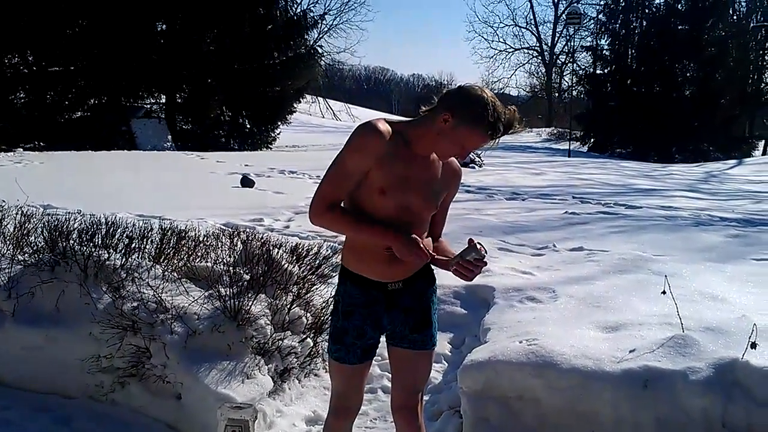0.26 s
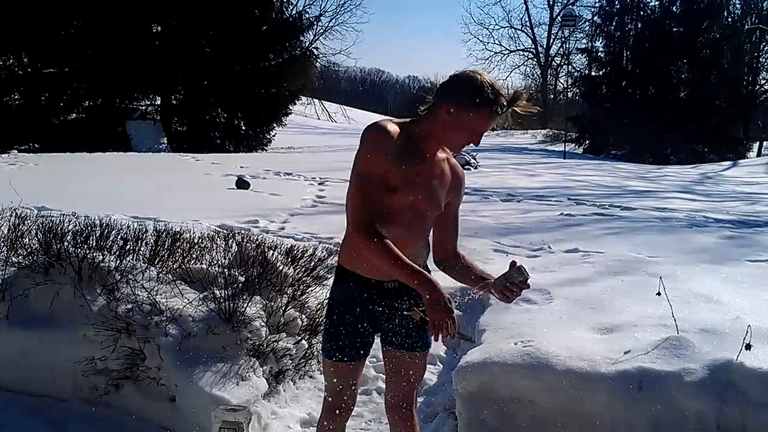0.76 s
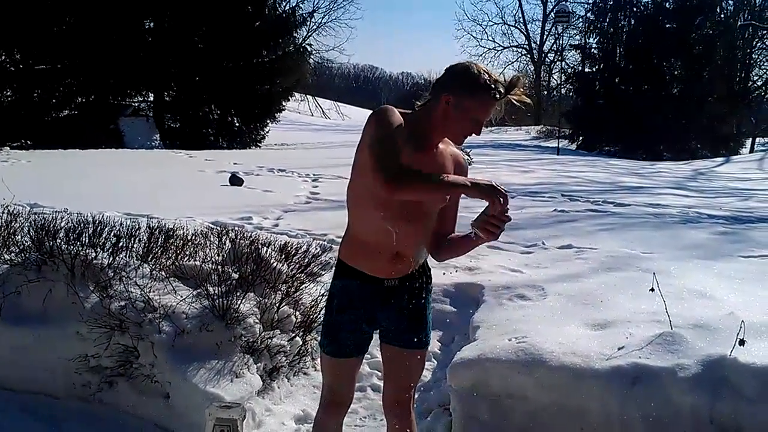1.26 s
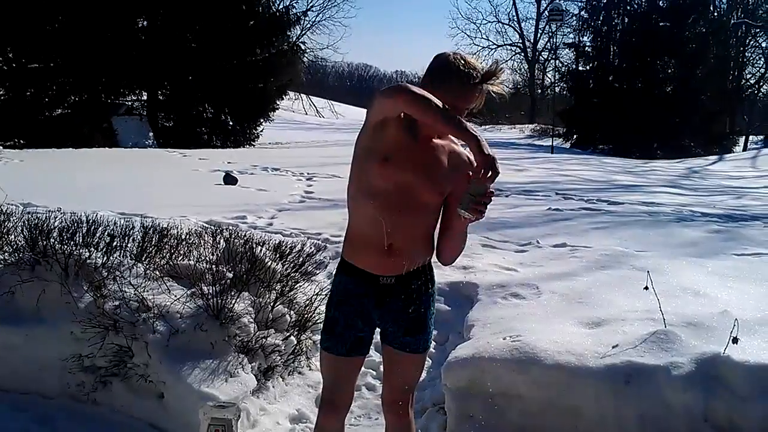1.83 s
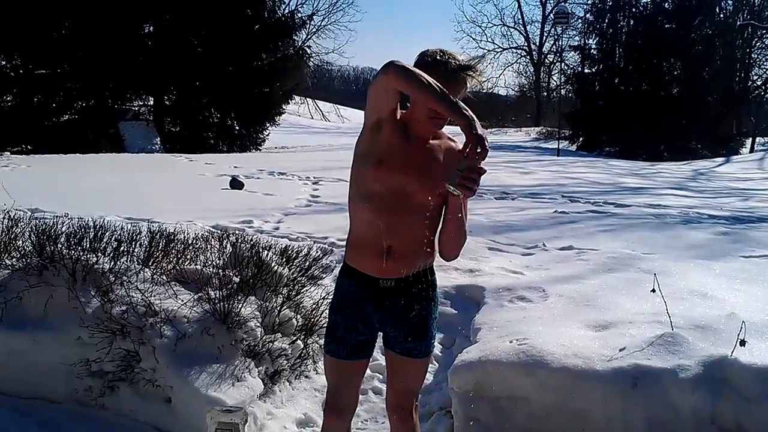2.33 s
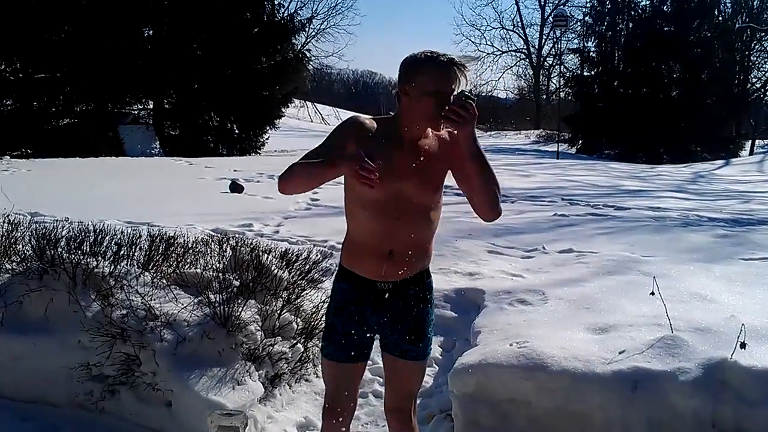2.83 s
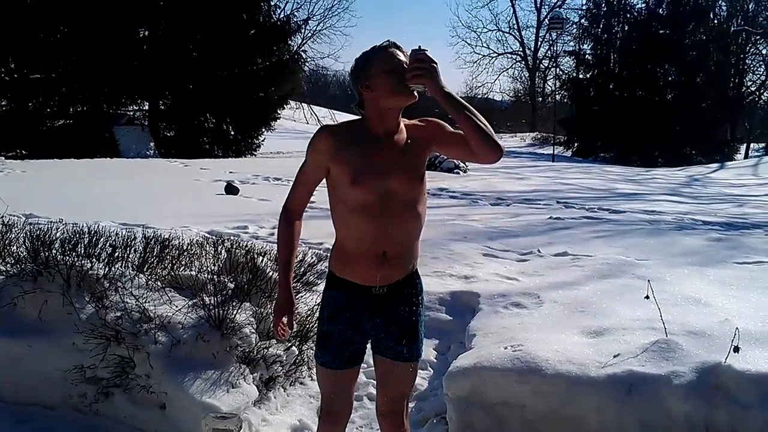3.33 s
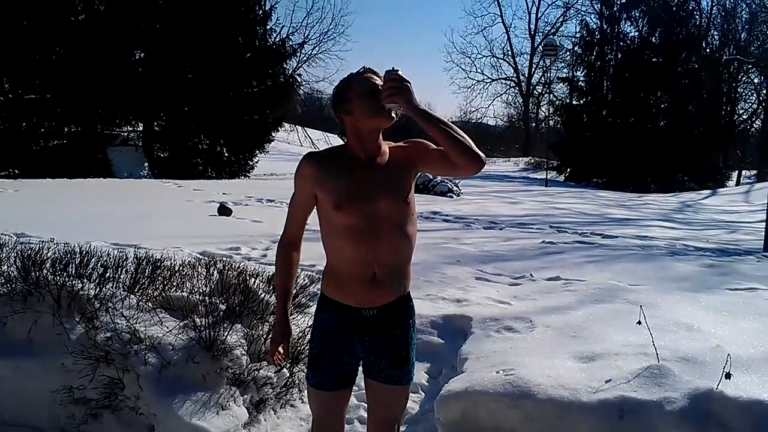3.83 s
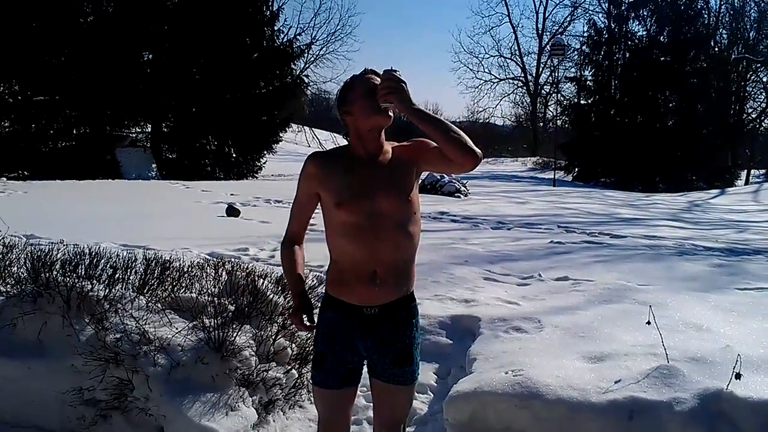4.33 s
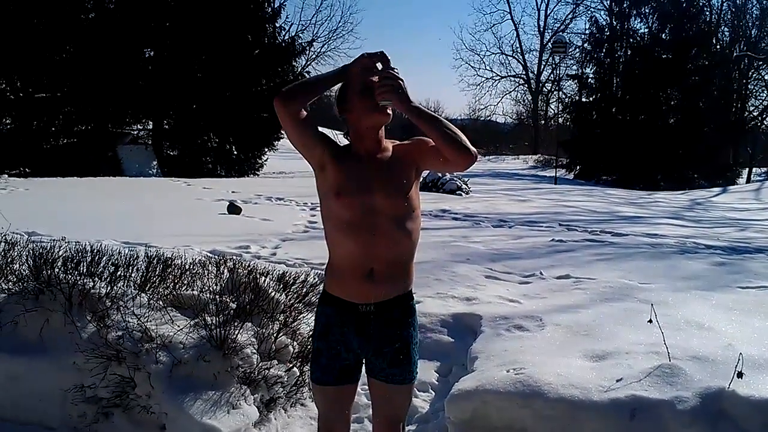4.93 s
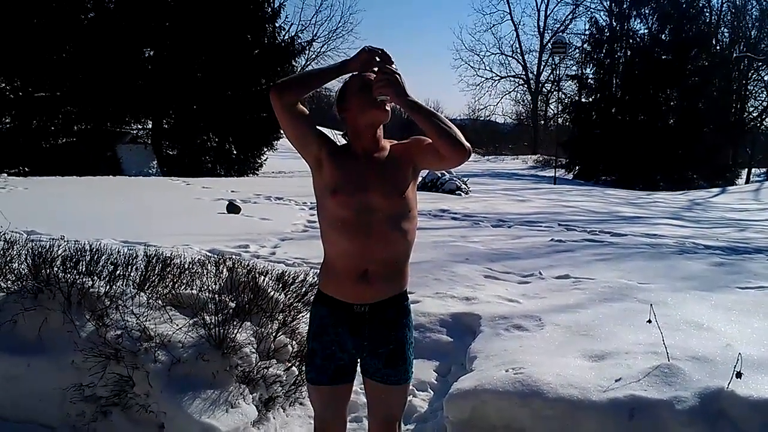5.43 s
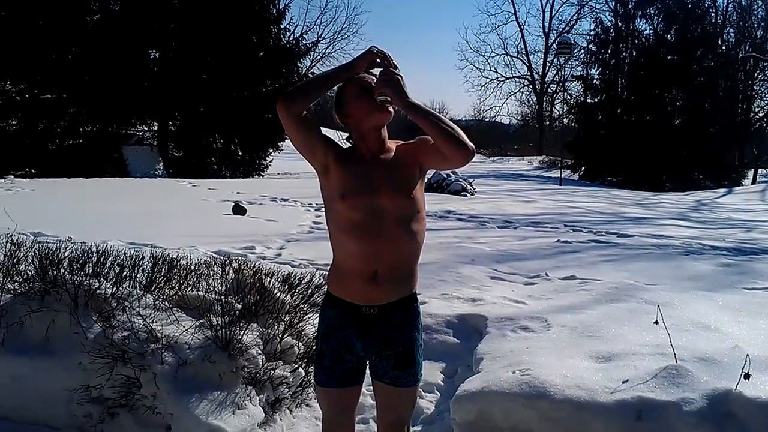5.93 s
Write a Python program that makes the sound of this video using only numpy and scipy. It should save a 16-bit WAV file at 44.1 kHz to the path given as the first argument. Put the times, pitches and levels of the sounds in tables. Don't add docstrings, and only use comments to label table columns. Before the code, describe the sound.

A drink can is pierced with a brief gas spray, then its lid cracks open loudly, amid water dripping on sheet metal and wind.

```python
import sys
import numpy as np
from scipy import signal
from scipy.fft import rfft, irfft, next_fast_len
from scipy.io import wavfile
from scipy.ndimage import uniform_filter1d

SR = 44100
rng = np.random.default_rng(int(sys.argv[2]) if len(sys.argv) > 2 else 0)


def undo_db(level):
    steps = np.asarray(level, float) / 20
    return 10 ** steps


def store_pcm(level_fs):
    pcm = np.round(np.clip(level_fs, -1, 1) * 32767).astype(np.int16)
    wavfile.write(sys.argv[1], SR, np.atleast_2d(pcm).T)


N = 272097
TIME = np.arange(N) / SR
SIZE = 2 * next_fast_len((N + SR) // 2)
HZ = np.maximum(np.arange(SIZE // 2 + 1) * SR / SIZE, 1)
SUDDEN_S = 5e-5


# time in seconds, level in dB.
SNAP_LEVEL = [
    (2.3843, -96),
    (2.3852, -8),
    (2.388, -4.5),
    (2.395, -7),
    (2.41, -14.5),
    (2.425, -24),
    (2.44, -52),
    (2.47, -88),
]
# frequency in Hz, level in dB per Hz.
SNAP_COLOUR = [(60, -48.5), (150, -22), (560, -21), (720, -12.5), (1000, -12), (1400, -12), (2100, -5),
               (2700, -10), (3900, -3), (4700, -10), (6800, -14), (8700, -12), (16000, -31.5)]
# frequency in Hz, width in Hz, level in dB.
CAN_MODES = [(2076, 60, 2.5), (2694, 44, 4), (3210, 74, -1), (3600, 60, -11.5), (3844, 46, 7.5),
             (4320, 26, -7), (4550, 11, -16), (4700, 44, -25.5), (5870, 45, -23), (6300, 91, -30),
             (8320, 31, -16.5), (8400, 43, -22.5)]


def snap():
    body = colour(SNAP_COLOUR) + modes(CAN_MODES) * undo_db(-6.5)
    crackle = grains(15000, spread_db=-1.0)
    return through(level(SNAP_LEVEL) * undo_db(2.0 * drift(147.2)) * crackle, body)


# start in
# seconds, peak in dB, level of the edge above 7 kHz in dB, main ring in Hz, time for the rattle to fall 60 dB
# in seconds.
CLICKS = [(0.384, -37, -55, 2050, .03), (0.432, -23, -37, 5170, 0.089), (1.1276, -30, -51, 4800, 0.04),
          (1.4184, -29, -60, 3150, 0.11), (1.166, -24.5, -31.5, 4840, 0.13),
          (1.176, -21.5, -36.5, 3490, 0.055), (2.1012, -29, -72, 1770, 0.02), (2.1387, -23, -33, 2140, 0.1),
          (2.3164, -32, -51, 2470, 0.049), (2.348, -20, -30, 4400, 0.07), (2.356, -27, -50, 5600, .2),
          (2.496, -17, -50.5, 2180, 0.05), (2.5678, -18, -38, 6200, 0.025), (2.58, -32, -60, 5000, .02),
          (.231, -27, -48, 3300, .04), (3.29, -30, -70, 3300, .1), (5.8235, -36, -66, 3500, .05),
          (6.0205, -38, -66, 3600, .05), (1.0015, -42, -50, 6000, .02), (.9545, -44, -50, 6000, .02),
          (2.0705, -37, -60, 4500, .02), (2.0605, -46, -64, 6000, .015), (5.2225, -34, -52, 3880, .04),
          (2.819, -38, -50, 4800, 0.02), (3.0846, -33, -52, 4600, 0.03), (1.493, -36, -58, 3300, .06),
          (1.644, -38, -56, 5000, .03), (1.861, -40, -58, 3400, .04), (3.2933, -27, -84, 2012, 0.26),
          (3.451, -26, -51, 2290, 0.11), (5.228, -28, -52, 3220, 0.13), (.8993, -23, -55, 4200, .08),
          (0.904, -30, -48, 4500, 0.22), (.926, -36, -49, 4400, .04), (5.49, -17, -32, 3190, 0.05),
          (5.498, -21, -48.5, 3000, 0.07)]


def clicks():
    rattle = bursts((s, db - 16.0, 0.001, t60) for s, db, edge_db, hz, t60 in CLICKS)
    edge = bursts((s, edge_db - 3.5, 0.00037, .5 * t60) for s, db, edge_db, hz, t60 in CLICKS)
    rings = swells((s, db - 14.5, hz, SUDDEN_S, t60) for s, db, edge_db, hz, t60 in CLICKS)
    wall = colour([(700, -19.5), (1800, 0), (4500, -5.0), (6500, -14.5), (8000, -35.0), (16000, -102)])
    wall = wall * (1 + modes(CAN_MODES) * undo_db(-5.0))
    bright = colour([(3000, -25.0), (6500, 1.0), (9500, -6.5), (16000, -20.5)])
    noise = grains(10000, spread_db=3.0)
    return through(rattle * noise, wall) + through(edge * noise, bright) + rings


# peak time in seconds, level in dB, pitch in Hz, rise in seconds, time to fall 60 dB in seconds.
FLARES = [(.4105, -34.5, 4350, .003, .04), (.416, -37, 3900, .002, .03), (.424, -31, 3270, 0.0039, .04),
          (.433, -36, 5840, 0.0011, .02), (.434, -38, 1750, 0.0033, .06), (.906, -35, 5280, 0.0025, 0.03),
          (.93, -40, 1610, 0.0051, .05), (2.145, -36.5, 3900, 0.0028, 0.035),
          (2.156, -43, 3900, 0.0027, .05), (2.109, -49, 3600, 0.0038, 0.037), (5.83, -48, 2590, .003, .06),
          (5.83, -49, 3500, .003, .06), (1.1765, -30, 4700, 0.0009, .025), (1.1765, -35, 2400, .001, .025),
          (2.3865, -18, 4650, 0.0013, .03), (2.3885, -10.5, 2150, 0.0026, .05),
          (2.393, -9, 3870, 0.0042, 0.031), (2.3965, -8, 4020, .003, .045), (2.405, -15, 3950, .002, .03),
          (2.4005, -14, 4280, .003, .04), (2.4015, -18, 3200, .002, .025), (2.412, -22, 4350, .003, .05),
          (2.47, -38, 4550, .006, .06), (2.455, -40, 3400, .004, .06), (2.975, -42, 4500, .002, .025),
          (2.84, -46, 3150, .005, .04), (3.14, -44, 3750, .005, .05), (2.984, -40, 2100, .002, .03),
          (2.4985, -28, 2180, .002, .06), (3.297, -30.5, 2022, 0.0019, 0.047),
          (.262, -39, 2210, .01, 0.099), (2.414, -17, 3900, .003, 0.054), (2.417, -23.5, 1820, .003, 0.037),
          (2.4255, -25, 3160, .003, .025), (2.431, -29.5, 2250, .002, .03), (2.433, -39, 3350, .002, .03),
          (2.498, -27.5, 3410, .001, 0.044), (2.504, -40, 3830, .002, .04),
          (2.578, -30, 3050, 0.00083, 0.027), (5.493, -32, 2780, 0.0022, 0.057),
          (5.498, -32.5, 3330, 0.0018, .05)]
# start in seconds, level in dB, hold in seconds, time to fall 60 dB in seconds.
SCRAPE = (2.446, -35, 0.036, .05)
# frequency in Hz, level in dB per Hz.
SCRAPE_COLOUR = [(2000, -25), (2900, -8), (3500, -1), (4000, -6), (4600, -1.5), (5200, -12), (6500, -25),
                 (16000, -60)]


def flares():
    scrape = through(bursts([SCRAPE]) * grains(6000, spread_db=-0.5), colour(SCRAPE_COLOUR))
    return swells(FLARES) * undo_db(2.4 * drift(250)) + scrape


# peak time in seconds, level in dB, pitch in Hz, rise in seconds, time to fall 60 dB in seconds.
GLUGS = [(.438, -35.5, 948, 0.0021, 0.098), (1.177, -22.5, 870, 0.0015, 0.014),
         (2.39, -2, 724, 0.0024, 0.045), (2.402, -17, 845, 0.0086, 0.043),
         (2.424, -28.5, 606, 0.0058, 0.043), (2.502, -28.5, 790, 0.0042, 0.066),
         (2.577, -14.5, 790, 0.0046, 0.045), (2.57, -23.5, 870, 0.007, 0.034), (2.584, -28, 880, .003, .06),
         (5.775, -47, 700, .006, .05), (5.2, -45, 800, 0.0036, .05), (5.18, -46.5, 520, 0.0075, .08),
         (2.984, -36, 980, 0.002, 0.02), (2.975, -40, 900, .002, .025), (3.04, -44, 900, .003, .03),
         (3.052, -43, 1000, .003, .04), (3.6, -40, 670, .003, 0.025)]


def glugs():
    return swells(GLUGS) * undo_db(2.5 * drift(70))


# start in seconds, rise in seconds, level in dB, sag in dB per second, stop in seconds.
JETS = [
    (.381, .003, -53.5, 1.5, 0.45),
    (0.397, 0.01, -36.5, 69, 0.65),
    (2.344, 0.006, -46, 28.5, 2.38),
    (2.425, 0.013, -39, 50, 2.485),
]


def jets(rows):
    out = np.zeros(N)
    for s, rise, db, sag, stop in rows:
        opening = np.clip((TIME - s) / rise, 0, 1) ** 2
        sagged_db = sag * np.clip(TIME - s - rise, 0, stop - s)
        shut_db = 360 * np.clip(TIME - stop, 0, 1)
        out += opening * undo_db(db - sagged_db - shut_db)
    return out


# peak time in seconds, level in dB, rise in seconds, time to fall 60 dB in seconds.
STIRS = [
    (.3, -69, 3.6, 14.6),
    (1.08, -56, 0.084, 0.97),
    (2.2, -71.5, 0.6, 1.6),
    (2.87, -69, 0.39, 1.2),
    (3.1, -69, 0.3, 28),
    (3.6, -70, .06, 1.0),
    (5.65, -76, 0.06, 2.6),
    (5.37, -76, .05, .6),
]


def froth():
    out = np.zeros(N)
    for s, db, rise, t60 in STIRS:
        swell = np.exp(-(np.minimum(TIME - s, 0) / rise) ** 2)
        out += swell * undo_db(db - 60 * np.maximum(TIME - s, 0) / t60)
    return out


# start in seconds, peak in dB.
BUBBLE_POPS = [(0.235, -45), (0.52, -25), (.628, -32), (0.9046, -52), (1.0658, -38), (1.4555, -42.5),
               (1.493, -44), (1.54, -37.5), (1.5577, -38), (1.596, -48), (1.644, -40), (1.9848, -34),
               (2.7195, -41), (2.8898, -34), (2.934, -39), (2.9807, -35), (3, -36), (3.0364, -39),
               (3.24, -51), (3.365, -46), (3.494, -48), (3.404, -37), (3.5454, -36), (3.6513, -43),
               (3.6877, -34), (3.9935, -39), (4.6635, -47.5), (5.3553, -44), (5.928, -44)]
# frequency in Hz, level in dB per Hz.
JET_COLOUR = [(500, -24.5), (1000, -6), (2500, -8.5), (4200, -3.5), (6900, -7), (9700, -8.5),
              (13000, -14.5), (16000, -15.5)]
# frequency in Hz, level in dB per Hz.
FIZZ_COLOUR = [(800, -17), (2000, -38.5), (4200, 2), (6900, -5.5), (9700, -6.5), (13000, -15.5),
               (16000, -13.5)]


def spray():
    gas = rng.standard_normal(N) + 0.6 * grains(1500, spread_db=2.5)
    gas = undo_db(1.6 * drift(60)) * gas
    slit = signal.butter(2, [7000, 12500], "band", fs=SR, output="sos")
    jet = jets(JETS[:-1]) * gas + signal.sosfilt(slit, jets(JETS[-1:]) * gas)
    bubbling = rng.standard_normal(N) + 0.28 * grains(710, spread_db=3.5)
    fizz = froth() * undo_db(3.0 + 2.2 * drift(25) + 2.0 * drift(9.1)) * bubbling
    pops = bursts((s, db - 7.5, 0, 0.0095) for s, db in BUBBLE_POPS) * rng.standard_normal(N)
    pitches = rng.uniform(4800, 11200, len(BUBBLE_POPS))
    rings = swells((s, db - 8.0, hz, SUDDEN_S, 0.0081) for (s, db), hz in zip(BUBBLE_POPS, pitches))
    return through(jet, colour(JET_COLOUR)) + through(fizz + pops, colour(FIZZ_COLOUR)) + rings


# frequency in Hz, width in Hz, level in dB.
SHEET_MODES = [(1262, 24, 1), (1360, 23, 0), (1476, 8.4, 4), (1530, 7, -4), (1551, 8.8, 3.5),
               (1593, 17, -3), (1644, 29.6, 4.5), (1820, 9.6, -9), (2180, 13.7, 3.5), (2290, 33, 0.5),
               (2513, 54, -1), (2960, 30, 2), (3150, 4.4, 0.5), (3130, 13, 3), (3550, 11, -1),
               (4020, 13, -2)]
# frequency in Hz, level in dB per Hz.
SHEET_CROWD = [(1000, -47), (1190, -16), (1260, 1), (1700, -6), (2600, -7), (2750, -13), (3200, 5),
               (4000, 3), (4600, -2), (6400, -6), (7000, -20.5), (12000, -27)]
# start in seconds, peak in dB, then upper modes
# and long ring in dB beside the peak.
DROP_ROWS = [(.001, -36, -12, -7), (.0473, -31.5, -14, -15), (.2319, -27.5, -10.5, -5.5),
             (.3825, -39.5, -11, -12), (.7312, -42, -16, -24), (.8999, -30.5, -3, -14.5),
             (1.0425, -39, -30, -5), (1.3853, -35, -7.5, -11.5), (1.6352, -43, -5, -23),
             (2.1444, -34.5, -0.5, -7), (2.3296, -32.5, -10, -20), (2.4444, -31.5, -6, -7),
             (2.5681, -31, -12, -28), (2.6494, -32.5, -21, -10), (2.7194, -38, -13, -19),
             (2.834, -44, -12, -20), (2.974, -41, -7.5, -30), (3.1394, -36, -9.5, -2.5),
             (3.2585, -43, -21, -10), (3.4032, -36, -1, -12), (3.4735, -34, -11, -5),
             (3.5384, -36, 0.5, -9), (3.7214, -37.5, -9.5, -8), (3.9883, -34.5, -16.5, -25.5),
             (4.2552, -33.5, -12, -28), (4.3974, -31.5, -11.5, -23), (5.1123, -41, -17, -12.5),
             (5.221, -36, -1.5, -15), (5.3, -49, -15, 0), (5.5713, -44, -8, -14),
             (5.5288, -31.5, -9, -13.5), (5.6092, -38.5, -3.5, -4)]
# start in seconds, peak in dB.
MORE_DROPS = [(0.15, -46), (1.125, -44.5), (1.2091, -37.5), (1.2946, -44), (1.417, -45), (1.53, -74),
              (1.697, -40.5), (1.8574, -43), (2.0265, -49), (2.76, -57), (3.8523, -44), (4.054, -46),
              (4.111, -38.5), (4.3301, -41), (4.4594, -35.5), (4.565, -41), (4.6352, -49.5), (4.7544, -47),
              (4.8, -44), (4.8534, -43.5), (4.655, -45.5), (4.904, -43), (5.8544, -54), (4.9404, -44),
              (5.128, -35.5), (5.369, -42), (5.3855, -40.5), (5.432, -36), (5.7134, -46.5),
              (5.8236, -39.5), (5.9, -36), (6.021, -38)]
COMMON_UPPER_DB, COMMON_RING_DB = -12, -15
DROPS = DROP_ROWS + [(s, db, COMMON_UPPER_DB, COMMON_RING_DB) for s, db in MORE_DROPS]


def drips():
    crowd_hz = np.sort(rng.uniform(1000, 12000, 260))
    crowd = modes([(hz, hz / 75, db) for hz, db in zip(crowd_hz, rng.normal(0, 2, 260))])
    sheet = colour(SHEET_CROWD) * crowd + modes(SHEET_MODES)
    upper = 1 / (1 + (2700 / HZ) ** 8)
    splash = grains(9000, spread_db=2.0)
    strike = rng.choice([-1, 1], N)
    low = bursts((s, db - 14.0, 0.042, 0.2) for s, db, up, ring in DROPS) * splash
    low += bursts((s, db + 7.0, 0, 0.0045) for s, db, up, ring in DROPS) * strike
    high = bursts((s, db + up - 15.5, 0.035, 0.055) for s, db, up, ring in DROPS) * splash
    high += bursts((s, db + up + 6.0, 0, 0.0085) for s, db, up, ring in DROPS) * strike
    patter = undo_db(-65 + 6.06 * drift(23)) * splash
    return through(low + patter, sheet * (1 - upper)) + through(high + patter * undo_db(-4.0), sheet * upper)


def long_ring():
    ring_hz, t60_s = 1655, 0.34
    push = bursts((s, db + ring - 5.0, 0.036, .03) for s, db, up, ring in DROPS) * (1 + 0.62 * drift(40))
    swell = signal.lfilter([40 / SR], [1, -undo_db(-60 / (t60_s * SR))], push)
    return swell * np.sin(2 * np.pi * ring_hz * TIME + 0.85 * drift(6))


# time in seconds, level in dB.
WIND = [(0, -49.5), (.26, -54.5), (.76, -73.5), (1.03, -57.5), (1.27, -53), (1.41, -57), (1.74, -64),
        (1.96, -71.5), (2.4, -68), (2.56, -41), (2.77, -56), (2.97, -55), (3.09, -62), (3.35, -59),
        (3.49, -53.5), (3.61, -61), (3.95, -61.5), (4.08, -69), (5.0, -70), (6.17, -72)]
# frequency in Hz, level in dB per Hz.
WIND_COLOUR = [(30, -43), (90, -23.5), (200, -4.5), (330, 2.5), (550, -10.5), (1000, -16.5), (2000, -55)]
# peak time in seconds, peak in dB, pitch in Hz.
STRONG_PUFFS = [(.0712, -35.5, 325), (.5103, -34.5, 400), (.5372, -33, 385), (1.0618, -31, 308),
                (1.1611, -32.5, 324), (1.1768, -34, 550), (1.19, -31, 372), (1.331, -32, 326),
                (1.342, -25, 527), (1.345, -34, 387), (1.365, -34, 287), (1.3875, -17, 650),
                (1.6743, -31, 355), (1.7762, -28.5, 390), (2.5628, -24.5, 467), (2.6051, -33, 332),
                (2.62, -20.5, 460), (2.6515, -26.5, 345), (2.6797, -29.5, 305), (2.6914, -27.5, 465),
                (2.8609, -29, 640), (2.8777, -30, 600), (3.2025, -31, 377), (3.233, -28, 340),
                (3.3702, -34, 503), (3.4377, -26.5, 370), (3.4823, -23.5, 477), (3.491, -31, 494),
                (3.499, -32, 477), (3.5062, -21, 350), (3.357, -33, 480), (3.396, -38, 420),
                (3.329, -38, 520), (3.21, -34, 330), (2.628, -30, 420), (.5455, -38, 330),
                (1.399, -30, 480)]
# peak time in seconds, peak in dB.
WEAK_PUFFS = [(0.1785, -35), (0.659, -45), (1.1236, -40), (1.214, -37), (1.376, -36), (1.5985, -34.5),
              (1.6402, -33), (1.6895, -34.5), (1.817, -38), (1.841, -35.5), (2.7314, -38.5),
              (2.9012, -36.5), (2.9874, -43), (3.269, -37), (3.3012, -35), (3.3414, -34), (3.662, -52.5),
              (3.919, -40), (3.938, -40.5), (3.981, -41), (0.546, -39), (1.7958, -41), (5.908, -45.5),
              (5.021, -49.5), (5.177, -47), (5.195, -49), (5.458, -48), (1.035, -39), (1.018, -49),
              (1.11, -37), (5.55, -44.5), (5.4458, -42), (5.9284, -47)]
WEAK_PUFF_HZ, WEAK_PUFF_SPREAD = 324, 0.03


def wind():
    turbulence = through(rng.standard_normal(N), colour(WIND_COLOUR))
    out = level(WIND) * rms_one(undo_db(5.9 * drift(45)) * turbulence)
    weak = [(s, db, WEAK_PUFF_HZ * np.exp(WEAK_PUFF_SPREAD * rng.standard_normal())) for s, db in WEAK_PUFFS]
    puffs = STRONG_PUFFS + weak
    chances = rng.uniform(0, 1, (len(puffs), 3))
    for (s, db, hz), (phase, slowing, length) in zip(puffs, chances):
        near = slice(round(s * SR) - 800, round(s * SR) + 800)
        turns = (TIME[near] - s) * hz
        shape = np.exp(-(turns / np.where(turns < 0, .42, 0.4 + 0.45 * length)) ** 2)
        swing = turns - 0.31 * slowing * np.clip(turns, -2, 2) ** 2
        eddy = shape * np.cos(2 * np.pi * 1.144 * swing - 1.5 + 2.35 * phase)
        wake = undo_db(-16.0) * np.exp(-((turns - .5) / 4.05) ** 2) * turbulence[near]
        out[near] += undo_db(db + 1.0) * (eddy + wake)
    return out


# frequency in Hz, level in dB per Hz.
AIR_COLOUR = [(30, -51.5), (110, -33), (250, -19.5), (480, -6), (780, -2), (1050, -8.5), (2000, -9.5),
              (4000, -19), (7000, -44.5), (15000, -49.5)]


def air():
    lag_s, share = .15, 0.37
    gusts_db = uniform_filter1d(np.interp(TIME, *np.transpose(WIND)), round(lag_s * SR))
    swell = undo_db(-29.5 + share * gusts_db + 2.3 * drift(13))
    return swell * through(rng.standard_normal(N), colour(AIR_COLOUR))


def wash(x):
    tail = bursts([(.03, -61, 0, 0.84)])[:SR] * rng.standard_normal(SR)
    band = signal.butter(4, [900, 4400], "band", fs=SR, output="sos")
    return signal.fftconvolve(x, signal.sosfilt(band, tail))[:N]


def rms_one(x):
    return x / np.sqrt(np.mean(x ** 2) + 1e-20)


def level(rows):
    return undo_db(np.interp(TIME, *np.transpose(rows)))


def colour(points):
    hz, db = np.transpose(points)
    log_gain = np.interp(np.log(HZ), np.log(hz), db) * np.log(10) / 20
    cepstrum = irfft(log_gain, SIZE)
    cepstrum[1:SIZE // 2] *= 2
    cepstrum[SIZE // 2 + 1:] = 0
    return np.exp(rfft(cepstrum))


def modes(rows):
    f = HZ[::8]
    total = np.zeros(len(f), complex)
    for k, (hz, width, db) in enumerate(rows):
        damping = 1j * f * width
        total += (-1) ** k * undo_db(db) * damping / (hz ** 2 - f ** 2 + damping)
    return np.interp(HZ, f, total)


def through(x, response):
    gain = rms_one(np.abs(response)) * np.exp(1j * np.angle(response))
    return irfft(rfft(x, SIZE) * gain, SIZE)[:N]


def drift(rate):
    r = np.exp(-2 * np.pi * rate / SR)
    return rms_one(signal.lfilter([1], [1, -2 * r, r * r], rng.standard_normal(N + SR))[SR:])


def grains(per_s, spread_db):
    sizes = undo_db(spread_db * np.minimum(rng.exponential(1, N), 5)) * rng.standard_normal(N)
    return rms_one(sizes * (rng.random(N) < per_s / SR))


def bursts(rows):
    out = np.zeros(N)
    for s, db, hold, t60 in rows:
        t60 = max(t60, .002)
        near = slice(int(np.ceil(s * SR)), int((s + hold + 2 * t60) * SR))
        out[near] += undo_db(db - 60 * np.maximum(TIME[near] - s - hold, 0) / t60)
    return out


def swells(rows):
    out = np.zeros(N)
    for s, db, hz, rise, t60 in rows:
        near = slice(int((s - .05) * SR), int((s + .3) * SR))
        age = TIME[near] - s
        growth = np.exp(-(np.minimum(age, 0) / rise) ** 2)
        decay = undo_db(-60 * np.maximum(age, 0) / t60)
        out[near] += undo_db(db) * np.where(age < 0, growth, decay) * np.sin(2 * np.pi * hz * age)
    return out


def scene():
    can = clicks() + snap() + glugs() + flares()
    echo = signal.lfilter([.3], [1, -.7], np.roll(can, round(0.025 * SR))) * undo_db(-22.5)
    return (can + echo + drips() + long_ring() + spray() + wind() + air() + wash(can))[None]


# frequency in Hz, width in Hz, share removed.
PORT_DIPS = [(6850, 700, 0.46), (14100, 900, .35)]


def port(x):
    for hz, width, share in PORT_DIPS:
        notched = signal.lfilter(*signal.iirnotch(hz, hz / width, SR), x)
        x = x + np.clip(share, 0, 1) * (notched - x)
    return x


def masked(x):
    mask_db, hole_db, hold_s, from_hz, top_hz = -59, -60, .05, 5800, 16000
    hz, s, frames = signal.stft(x, SR, nperseg=1024)
    hz = hz[:, None]
    power = np.abs(frames) ** 2
    r = np.exp(-512 / SR / hold_s)
    loud = signal.lfilter([1 - r], [1, -r], power.sum(axis=1, keepdims=True))
    bands = uniform_filter1d(uniform_filter1d(power, size=32, axis=1), size=3, axis=2)
    clear = bands > loud * undo_db(2 * mask_db)
    top = np.clip((clear * hz).max(axis=1, keepdims=True), from_hz, top_hz)
    audible = uniform_filter1d(power, size=8, axis=1) > loud * undo_db(2 * hole_db)
    keep = (hz <= top) * ((hz < from_hz) | audible)
    return signal.istft(frames * keep, SR, nperseg=1024)[1][:, :N]


def top_cut(x):
    return signal.sosfilt(signal.butter(12, 16860, fs=SR, output="sos"), x)


def record(dry):
    limited = .68 * np.tanh(dry / .68)
    thin = signal.sosfilt(signal.butter(4, 125, "high", fs=SR, output="sos"), limited)
    hissing = thin + undo_db(-83.5) * rng.standard_normal(dry.shape) + undo_db(-101) * drift(120)
    thump = 0.11 * signal.sosfilt(signal.butter(2, 45, "high", fs=SR, output="sos"), thin ** 2)
    return top_cut(masked(port(hissing) + thump))


dry = scene()
out = record(dry)
store_pcm(out)
```